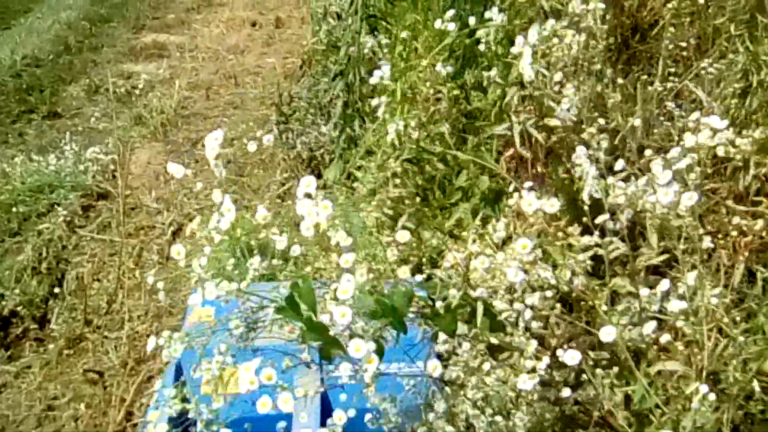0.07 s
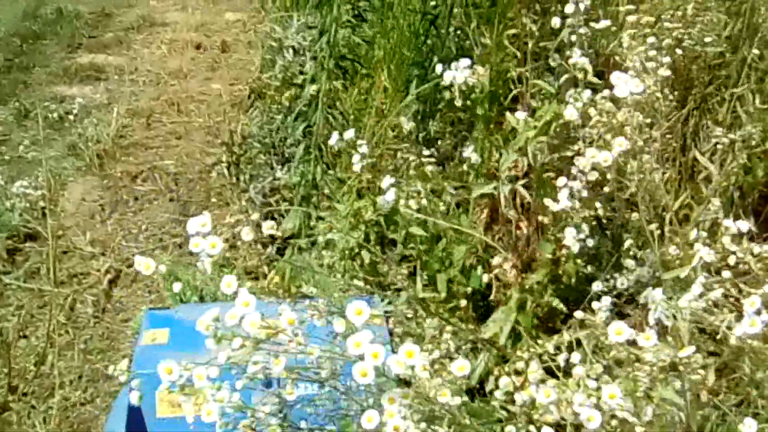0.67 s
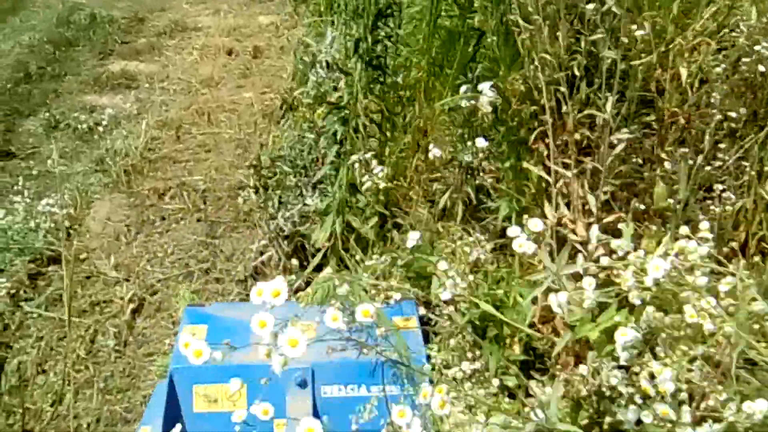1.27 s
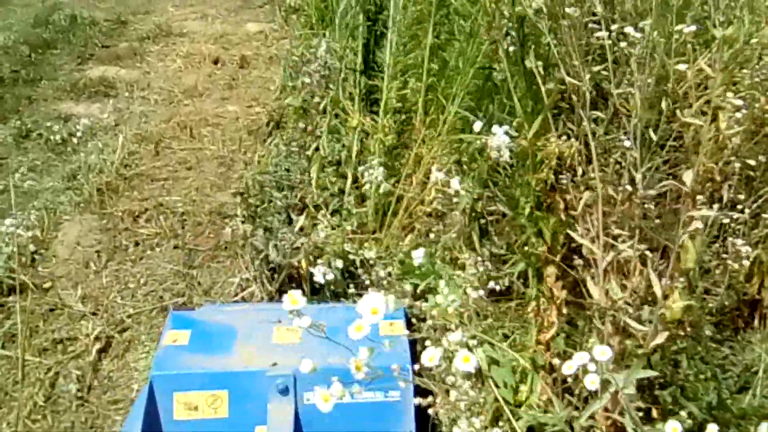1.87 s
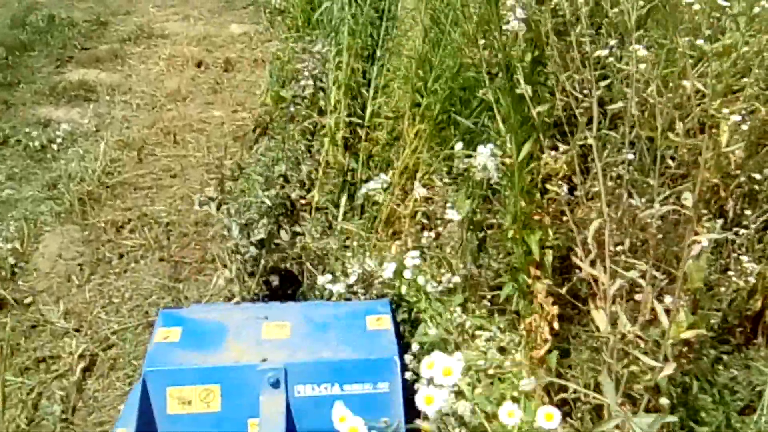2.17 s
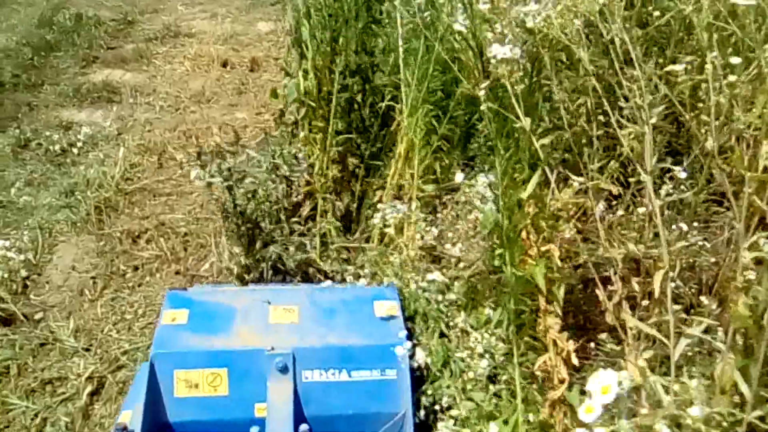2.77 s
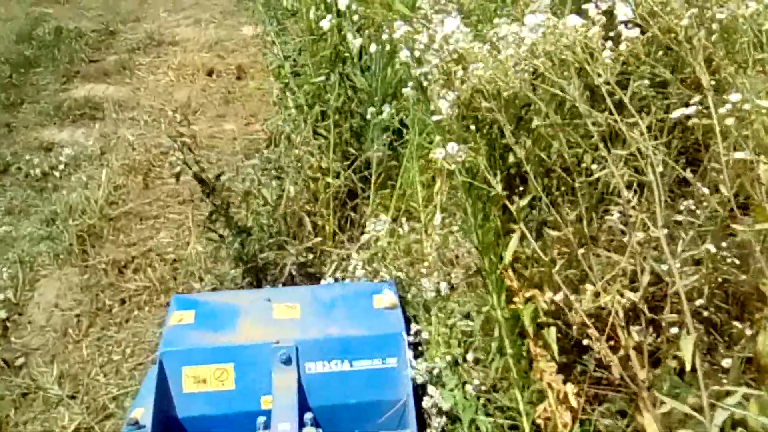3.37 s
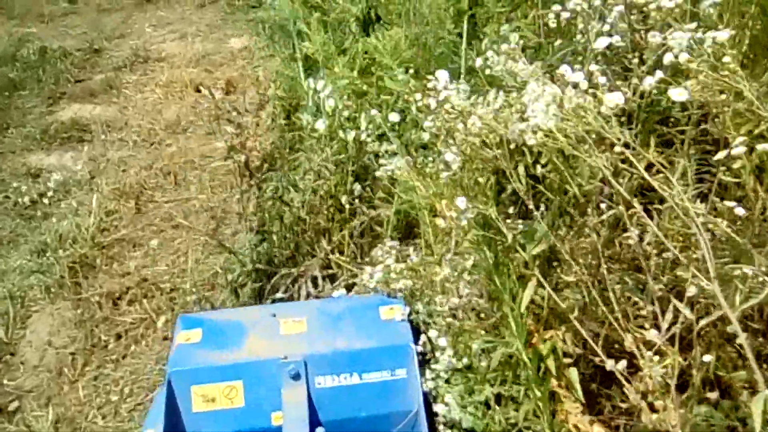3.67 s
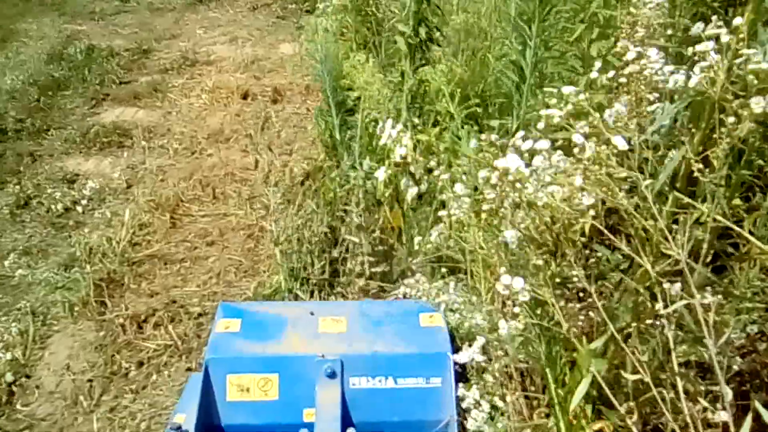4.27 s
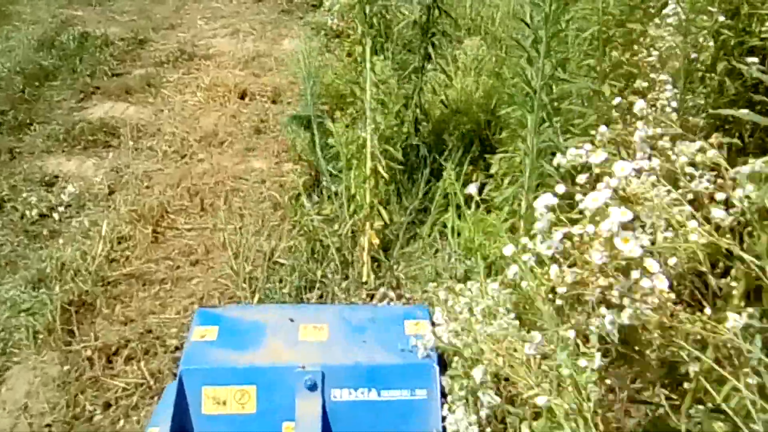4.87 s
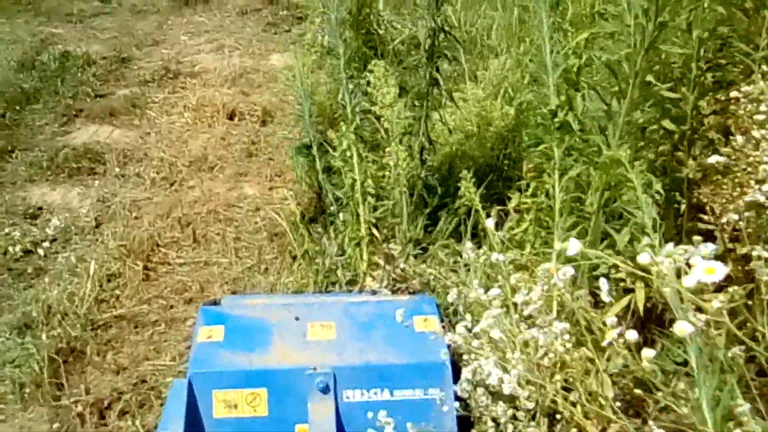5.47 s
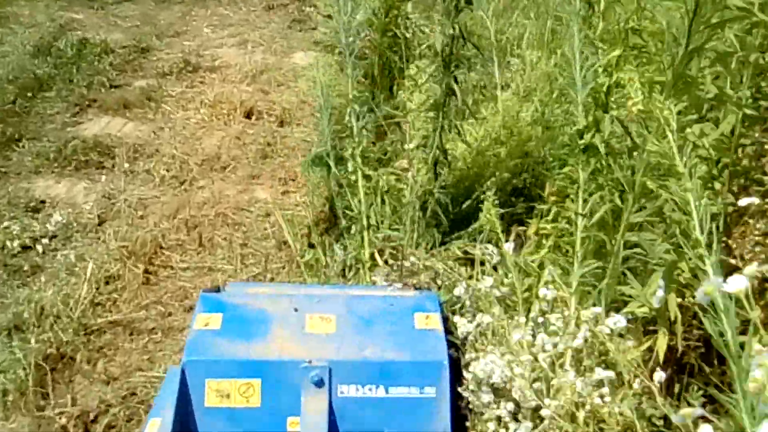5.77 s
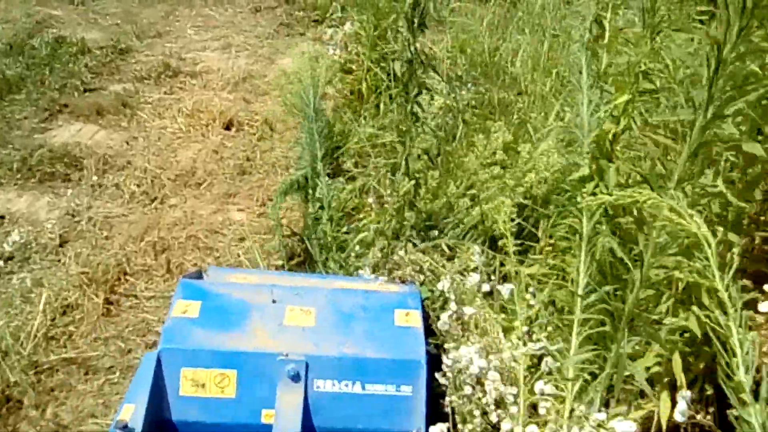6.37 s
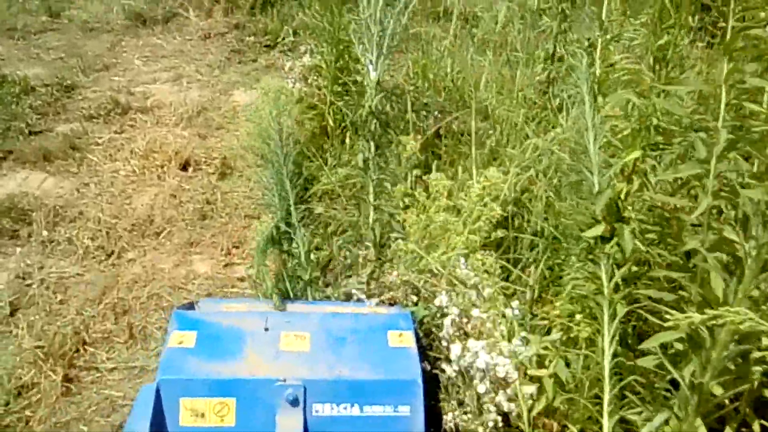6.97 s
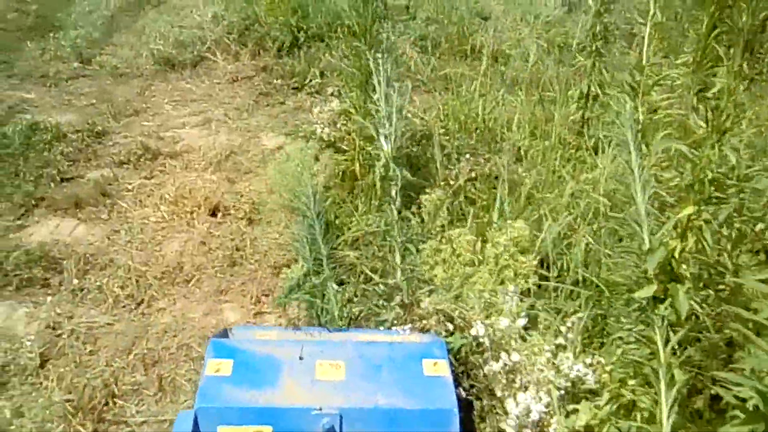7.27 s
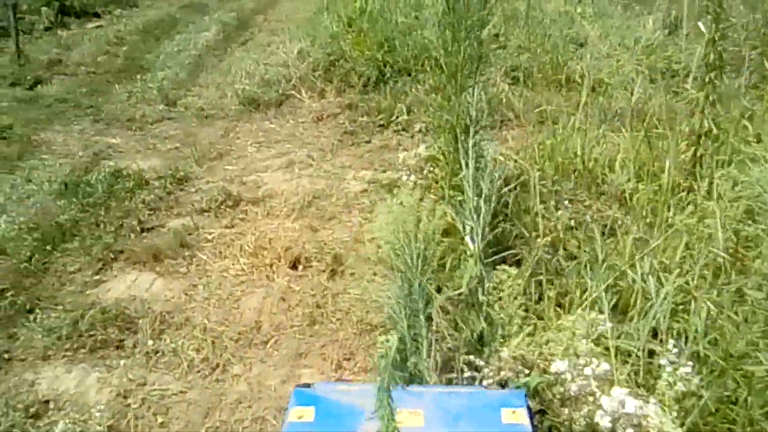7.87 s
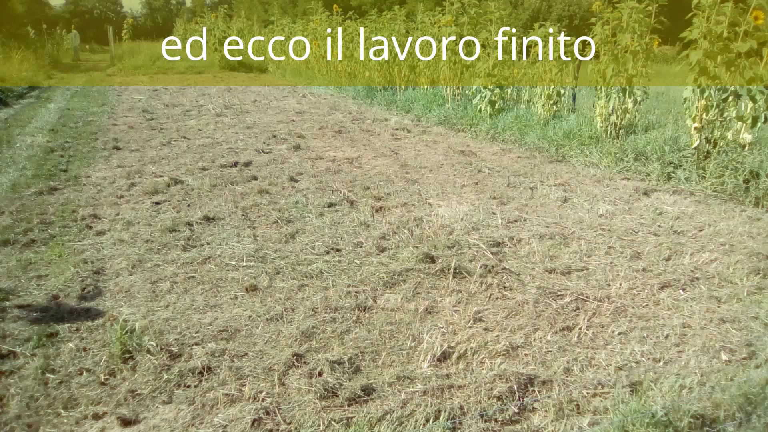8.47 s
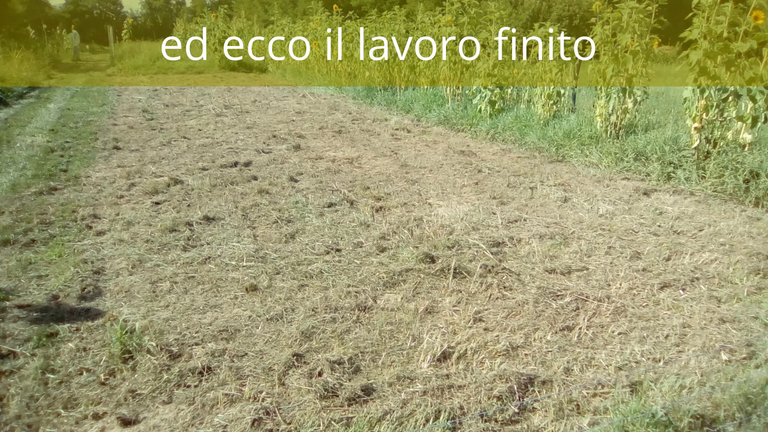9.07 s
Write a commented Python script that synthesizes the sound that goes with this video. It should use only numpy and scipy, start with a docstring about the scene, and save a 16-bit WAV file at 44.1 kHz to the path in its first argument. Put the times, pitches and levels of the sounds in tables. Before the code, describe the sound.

A small single-cylinder tractor chugs steadily with knocks, panel rattle and whining gears, while a flail mulcher in front hums and shreds tall weeds. Hard stalks and stones crack against the flails now and then. Midway the engine labours in a thick patch, booming and hissing, then recovers before everything cuts off abruptly. It is heard close, in stereo, from the driver's seat in a field.

```python
"""Tall weeds, from the driver's seat of a small single-cylinder tractor pushing a flail mulcher; stereo pair.
From the start each engine cycle gives a sharp pulse, knocks, a panel rattle and a puff of exhaust hiss; gears
whine, and out in front the rotor hums and shreds stalks under its steel hood. From 2 s hard stalks and stones
crack on the flails now and then. Near 4 s the engine labours in a thick patch: its speed sags, the casing
booms, the exhaust hisses, whine and rattle fade. By 6 s it recovers; at 8.27 s the sound breaks off abruptly."""
import sys
import numpy as np
from scipy import signal
from scipy.fft import rfft, irfft
from scipy.io import wavfile
from scipy.ndimage import uniform_filter1d, minimum_filter1d

SR = 44100
rng = np.random.default_rng(int(sys.argv[2]) if len(sys.argv) > 2 else 0)


def inscribe(sig):
    """Save sig as 16-bit PCM at rate SR to the path in sys.argv[1].

    A 1-D sig is mono; a 2-D sig holds one channel per row.
    Samples are clipped to [-1, 1] before scaling.
    """
    pcm = np.round(np.clip(np.atleast_2d(sig).T, -1, 1) * 32767)
    wavfile.write(sys.argv[1], SR, pcm.astype(np.int16))


N = 401751
TIME = np.arange(N) / SR

# engine speed: t/s, firing rate/Hz
FIRING_RATE = [(0.0, 26.761), (0.82, 27.071), (1.37, 26.942), (1.75, 27.501), (2.16, 27.135),
               (2.69, 27.332), (3.61, 26.814), (4.19, 25.629), (4.34, 25.987), (4.55, 25.449), (4.8, 25.61),
               (5.08, 24.249), (5.34, 25.451), (6.3, 27.994), (6.75, 27.696), (7.6, 27.314), (8.27, 26.37)]
# engine effort, used as its swing about the mean: t/s, level/dB
ENGINE_EFFORT = [(0, -45.5), (1.4, -45.5), (3.9, -44.5), (4.8, -41), (5.4, -39), (6.1, -41.5), (6.5, -44.5),
                 (7.6, -49.5), (8.27, -45.5)]
# lines of the engine pulse: multiple of the firing rate, relative level/dB
PULSE_ORDERS = [(2, -39.5), (3, -44.5), (4, -29.5), (5, -26.5), (6, -37.5), (7, -36), (8, -29), (9, -28.5),
                (10, -32), (11, -32.5), (12, -26.5), (13, -33), (14, -38), (15, -30.5), (16, -37),
                (17, -31), (18, -47), (19, -39), (20, -39), (21, -41.5), (22, -34), (23, -46), (24, -35),
                (25, -39.5), (26, -60.5)]
# loudness of the engine's clatter: t/s, level/dB
CLATTER_CURVE = [(0, -24.5), (0.8, -27), (3.3, -26), (5.0, -25), (8.27, -24)]
# piston and valve knocks: place in the cycle/0-1, relative level/dB
CYCLE_KNOCKS = [(.06, -7), (.26, -4), (.55, -4.5), (.66, -4), (.83, -16)]
# resonances of the engine block: f/Hz, width/Hz, relative level/dB
BLOCK_MODES = [(826, 80, -0.5), (1095, 110, 0), (1209, 31, -2), (1380, 260, -9), (1700, 120, -8),
               (1811, 50, -7), (2271, 53, -5), (2487, 54, -5), (3250, 560, -12.5)]
# spectrum of the exhaust hiss: f/Hz, relative level/dB
HISS_SPECTRUM = [(800, -24.5), (2500, 0.5), (6500, 5), (8200, -9.5), (10500, -13.5), (12000, -21.5),
                 (13800, -16.5), (15000, -8), (16000, -24.5)]
# resonances of a loose body panel: f/Hz, width/Hz, relative level/dB
PANEL_MODES = [(2493, 34, -2), (3060, 45, 4), (3200, 84, -1), (3280, 32, 5.5), (3470, 35, -2),
               (3650, 41, 3), (4300, 43, -11.5)]
# bouts in which the panel rattles harder: t/s, half length/s, rise/dB
RATTLE_BOUTS = [(1.04, 0.094, 5.0), (2.05, 0.22, 4), (2.52, .16, 5.5), (3.08, .14, 5.5), (4.32, 0.12, 7.5),
                (6.65, 0.24, 2), (8.08, 0.09, 6.5)]
# meshing gears, with sidebands: multiple of the firing rate, relative level/dB
MESH_ORDERS = [(38, -41), (39, -33.5), (40, -44.5), (41, -39.5), (43, -55), (44, -33.5), (45, -39.5)]
# high whine of lightly loaded gears: multiple of the firing rate, relative level/dB
HIGH_WHINE_ORDERS = [(66, -40.5), (67, -45.5)]
# hum of the flail rotor: multiple of its turning rate, relative level/dB
HUM_ORDERS = [(4, -32.5), (5, -41.5), (8, -50), (12, -33), (15, -41.5), (30, -41)]
# strength of that hum, used as its swing about the mean: t/s, level/dB
HUM_CURVE = [(0.1, -24.5), (0.57, -25), (4.09, -28), (4.97, -32), (5.17, -30.5), (5.67, -26), (6.03, -21),
             (7.05, -34.5), (8.2, -25.5)]
# resonances of the steel hood: f/Hz, width/Hz, relative level/dB
HOOD_MODES = [(455.6, 110, -1.5), (565, 240, -13), (614, 11, 3.5), (662, 26, 4)]
# clumps of mulch passing under the hood: t/s, half length/s, rise/dB
MULCH_CLUMPS = [(0.78, .16, 2.5), (1.76, .13, 4.0), (2.66, .12, 4.5), (3.76, .16, 5), (4.78, .08, 4),
                (6.15, .33, 5.0)]
# spectrum of the shredding: f/Hz, relative level/dB
SHRED_SPECTRUM = [(500, -16.5), (1500, -6), (2800, 2), (4300, 1), (5200, -2), (5900, -0.5), (6900, -5),
                  (8000, -19), (10000, -24.5), (11500, -31.5), (13800, -33), (15000, -23), (16000, -46)]
# spectrum of the churned air: f/Hz, relative level/dB
AIR_SPECTRUM = [(12, -0.5), (25, -5.5), (45, -15.5), (80, -18), (125, -1.5), (200, -2), (400, -0.5),
                (520, -3.5), (750, -1), (1100, -6.5), (1400, -9), (2000, -14), (4000, -8.5), (9000, -62)]
# hard stalks and stones on the flails: t/s, peak level/dB, ring f/Hz
FLAIL_HITS = [(2.119, -6.5, 3030), (2.865, -16, 6200), (3.170, -16, 2810), (3.857, -20, 5400),
              (4.040, -6.5, 4910), (5.459, -12, 3600), (7.362, -17, 6000), (8.131, -10, 3200),
              (8.242, -10, 3700), (8.259, -22, 4000)]
# likeness of noise at the two microphones: f/Hz, correlation/0-1
MIC_LIKENESS = [(60, .997), (250, .994), (550, .985), (1000, .88), (1400, .77), (2000, .62), (4000, .35),
                (8000, .05)]
# balance of the microphone pair: f/Hz, left minus right level/dB
MIC_BALANCE = [(60, 0), (140, -2.3), (330, -2), (800, -2), (1200, -0.5), (1700, -6.5), (2500, 0),
               (3200, 4.5), (3900, 0.5), (4800, 0), (5800, 8.5), (6800, 12), (9000, 19.5), (15000, 9)]

FREE_HZ, BOGGED_HZ = 27.5, 25.8   # firing rate running free and fully bogged down
CASE_RING_HZ, CASE_RANGE_HZ = 27.1, .65   # firing rates around which the gear case rings
ROTOR_RATIO = 1.3594   # rotor turns per firing
PULSE_AT, PUFF_AT, RATTLE_AT, BOUNCE_AT = 0.1786, .87, .69, 1   # places in the cycle, 0-1
# levels running free, and their change when fully bogged down
PULSE_DB, PULSE_BOGGED_DB = -18.5, -0.6
BOOM_DB, BOOM_BOGGED_DB = -2, 7.5
RATTLE_DB, RATTLE_BOGGED_DB = -29, -10
AIR_DB, AIR_BOGGED_DB = -25.5, 1
# gains at mean effort, and dB gained per dB of effort
EXHAUST_DB, EXHAUST_FOLLOWS = -39.5, 1.81
GEAR_DB, GEAR_FOLLOWS = -10.5, -0.23
HOOD_DB, HOOD_FOLLOWS = -25.5, .25
SHRED_DB, SHRED_FOLLOWS = -26.3, 0.18
HUM_DB, HUM_FOLLOWS = 0.65, 0.94   # gain at the mean of HUM_CURVE, and dB per dB of its swing
STOP_S = 8.27


def from_db(db):
    """Decibels to gain."""
    return 10 ** (np.asarray(db) / 20)


def rms_one(x):
    """Scale to unit rms."""
    return x / np.sqrt(np.mean(x ** 2) + 1e-20)


def in_time(rows):
    """A curve at every sample."""
    return np.interp(TIME, *np.transpose(rows))


def swing(rows):
    """A level curve as dB above its mean while the machine runs."""
    db = in_time(rows)
    return db - db[TIME < STOP_S].mean()


def swells(rows):
    """Bell-shaped rises in level/dB, one for each row."""
    return sum(db * np.exp(-((TIME - s) / half_s) ** 2) for s, half_s, db in rows)


def at_hz(points, size=4096):
    """A spectrum on an even frequency grid, joined on a log axis."""
    hz, value = np.transpose(points)
    return np.interp(np.log(np.linspace(1, SR / 2, size + 1)), np.log(hz), value)


def drift(rate):
    """A random wander of spread 1, with `rate` new values a second."""
    knots = rng.standard_normal(4000)
    return np.interp(TIME * rate, np.arange(len(knots)), knots) * np.sqrt(3 / 2)


def colour(x, db):
    """Minimum-phase filter from levels on the even grid: it rings after a blow, never before."""
    cepstrum = irfft(np.log(from_db(db)))
    half = len(cepstrum) // 2
    cepstrum[1:half] *= 2
    cepstrum[half + 1:] = 0
    impulse = irfft(np.exp(rfft(cepstrum)))
    return signal.oaconvolve(np.atleast_2d(x), impulse[None], axes=1)[:, :N]


def resonate(x, modes):
    """Parallel resonances with alternating signs."""
    out = 0
    for k, (hz, width, db) in enumerate(modes):
        r = np.exp(-np.pi * width / SR)
        poles = [1, -2 * r * np.cos(2 * np.pi * hz / SR), r * r]
        out = out + (-1) ** k * from_db(db) * (1 - r * r) / 2 * signal.lfilter([1, 0, -1], poles, x)
    return out


def wide_noise():
    """White noise at the two microphones, alike in the bass and unrelated in the treble."""
    alike = np.clip(at_hz(MIC_LIKENESS), -.999, .999)
    mid = colour(rng.standard_normal(N), 10 * np.log10(1 + alike))
    side = colour(rng.standard_normal(N), 10 * np.log10(1 - alike))
    return rms_one(mid + side * [[1], [-1]])


def burst(cycles, place, rise, decay):
    """Envelope that swells and dies once a cycle; times are shares of the cycle."""
    age = (cycles - place) % 1
    return (1 - np.exp(-age / rise)) * np.exp(-age / decay)


def shaft_tones(turns, orders, waver_db, waver_rate, shake_rad=0.06):
    """Tones locked to a shaft, each wavering in strength and shaken in phase."""
    out = 0
    for k, db in orders:
        angle = 2 * np.pi * (k * turns + rng.random()) + shake_rad * drift(waver_rate)
        out = out + from_db(db + waver_db * drift(waver_rate)) * np.cos(angle)
    return np.sqrt(2) * out


def engine_pulse(cycles, speed, boom_db, boom_hz=330, boom_octaves=0.22,
                 bare_db=-32.5, bare_hz=600, waver_db=0.76, uneven_db=0.67):
    """One sharp suction pulse a cycle, the pipes ringing on in between; under load the casing booms."""
    out = 0
    for k, db in PULSE_ORDERS:
        near_boom = np.exp(-(np.log2(k * speed / boom_hz) / boom_octaves) ** 2)
        gain = from_db(db + near_boom * boom_db + waver_db * drift(7))
        bare = from_db(bare_db) * np.exp(-(k * speed / bare_hz) ** 2)
        # what a line holds beyond the bare pulse is ringing, which leads or lags it
        ring_phase = rng.choice([-1, 1]) * np.arccos(np.clip(bare / gain, 0, 1))
        out = out - gain * np.cos(2 * np.pi * k * (cycles - PULSE_AT) + ring_phase)
    return rms_one(out * from_db(uneven_db * drift(27)))


def clatter(cycles, uneven_db=3.5, floor=0.26):
    """Piston and valves knock on the block, a little differently in each cycle."""
    knocks = sum(from_db(db + uneven_db * drift(27)) * burst(cycles, place, rise=0.014, decay=.07)
                 for place, db in CYCLE_KNOCKS)
    return rms_one(resonate(wide_noise() * (floor + knocks), BLOCK_MODES))


def exhaust_hiss(cycles, uneven_db=0.5, crunch_db=0.5):
    """Gas jets out in a ragged puff each time the exhaust valve opens."""
    ragged = from_db(uneven_db * drift(27) + crunch_db * drift(700))
    puffs = ragged * burst(cycles, PUFF_AT, rise=0.064, decay=.14)
    return rms_one(colour(wide_noise() * puffs, at_hz(HISS_SPECTRUM)))


def panel_rattle(cycles, decay=.035, uneven_db=2.4, bounce_db=-4, buzz=0.053):
    """Each firing throws a loose panel against its stop: a short ping, a bounce and a faint buzz."""
    ping = burst(cycles, RATTLE_AT, 0.012, decay) * from_db(uneven_db * drift(27))
    bounce = burst(cycles, BOUNCE_AT, 0.0032, decay) * from_db(bounce_db + uneven_db * drift(27))
    return rms_one(resonate(wide_noise() * (ping + bounce + buzz), PANEL_MODES))


def engine(cycles, speed, bogged, effort_db):
    """Close to the seat: effort hardens the exhaust; as speed sags the casing booms, the panel quietens."""
    boom_db = BOOM_DB + BOOM_BOGGED_DB * bogged
    pulse = from_db(PULSE_DB + PULSE_BOGGED_DB * bogged) * engine_pulse(cycles, speed, boom_db)
    knocks = from_db(in_time(CLATTER_CURVE)) * clatter(cycles)
    hiss = from_db(EXHAUST_DB + EXHAUST_FOLLOWS * effort_db) * exhaust_hiss(cycles)
    rattle = from_db(RATTLE_DB + RATTLE_BOGGED_DB * bogged + swells(RATTLE_BOUTS)) * panel_rattle(cycles)
    return pulse + knocks + hiss + rattle


def gears(cycles, speed, effort_db, ring_db=11, high_db=1.5, fade_db_per_hz=12.5):
    """The mesh whines loudest at the speed that rings its case; a higher whine joins when running free."""
    in_tune = np.exp(-((speed - CASE_RING_HZ) / CASE_RANGE_HZ) ** 2)
    sag_hz = np.maximum(FREE_HZ - speed, 0)
    mesh = shaft_tones(cycles, MESH_ORDERS, waver_db=1.0, waver_rate=17, shake_rad=0.2)
    high_whine = shaft_tones(cycles, HIGH_WHINE_ORDERS, waver_db=3.0, waver_rate=25, shake_rad=0.4)
    return (from_db(GEAR_DB + ring_db * in_tune + GEAR_FOLLOWS * effort_db) * mesh
            + from_db(high_db - fade_db_per_hz * sag_hz) * high_whine)


def rotor_hum(cycles):
    """The flail rotor, geared to the engine, hums at multiples of its turning rate."""
    hum = shaft_tones(cycles * ROTOR_RATIO, HUM_ORDERS, waver_db=2.5, waver_rate=8)
    return from_db(HUM_DB + HUM_FOLLOWS * swing(HUM_CURVE)) * hum


def hood_drumming(lumpy_db=0.5):
    """Mulch drums on the steel hood, swelling as each clump passes."""
    mulch = wide_noise() * from_db(lumpy_db * drift(50))
    return from_db(swells(MULCH_CLUMPS)) * rms_one(resonate(mulch, HOOD_MODES))


def shredding(snaps_per_s=700, size_db=4.5, snap_s=0.0038, rustle=0.39):
    """Stalks snap in quick succession, each a tiny burst over the rustle of leaves."""
    sizes = from_db(size_db * np.minimum(rng.exponential(1, N), 3.5))
    snaps = (rng.random(N) < snaps_per_s / SR) * sizes ** 2
    power = signal.lfilter([1], [1, -np.exp(-1 / (snap_s * SR))], snaps + 1e-18)
    envelope = np.sqrt(rustle + power / power.mean() / 2)
    return rms_one(colour(wide_noise() * envelope, at_hz(SHRED_SPECTRUM)))


def rotor_air(patchy_db=2.5):
    """Turbulent air churned by the flails."""
    return rms_one(colour(wide_noise() * from_db(patchy_db * drift(60)), at_hz(AIR_SPECTRUM)))


def flail_hits(decay_s=0.0058, width_hz=900):
    """A hard stalk or a stone gives a brief crack with a ring of steel, dulled by the hood."""
    out, age = np.zeros((2, N)), np.arange(SR // 40) / SR
    dull = signal.butter(6, 7000, fs=SR, output="sos")
    for s, db, hz in FLAIL_HITS:
        snap = rng.standard_normal((2, len(age))) * np.exp(-age / decay_s)
        crack = signal.sosfilt(dull, resonate(snap, [(hz, width_hz, 0)]))
        start = round(s * SR)
        out[:, start:start + len(age)] += from_db(db) * crack / np.abs(crack).max()
    return out


def mulcher(cycles, bogged, effort_db):
    """Out in front: the rotor hums; the more weeds it takes in, the louder it drums, shreds and churns."""
    hum = rotor_hum(cycles)
    drumming = from_db(HOOD_DB + HOOD_FOLLOWS * effort_db) * hood_drumming()
    stalks = from_db(SHRED_DB + SHRED_FOLLOWS * effort_db) * shredding()
    air = from_db(AIR_DB + AIR_BOGGED_DB * bogged) * rotor_air()
    return hum + drumming + stalks + air + flail_hits()


def scene():
    """Engine, gears and mulcher from the driver's seat, all driven by one crankshaft."""
    speed, effort_db = in_time(FIRING_RATE), swing(ENGINE_EFFORT)
    cycles = np.cumsum(speed) / SR
    bogged = np.clip((FREE_HZ - speed) / (FREE_HZ - BOGGED_HZ), 0, 1)
    return (engine(cycles, speed, bogged, effort_db) + gears(cycles, speed, effort_db)
            + mulcher(cycles, bogged, effort_db))


def limiter(x, ceiling_db=-2.5, window=221):
    """The recorder turns its gain down for a few milliseconds around each peak above the ceiling."""
    needed = np.minimum(1, from_db(ceiling_db) / (np.abs(x).max(axis=0) + 1e-12))
    return x * uniform_filter1d(minimum_filter1d(needed, window), window)


def record(dry, left_lag_s=1.25e-4, cutoff_hz=15700):
    """Two unlike microphone ports, the left slightly farther off; then limiter, dead stop and top cut."""
    balance_db = at_hz(MIC_BALANCE)
    left = np.interp(TIME - left_lag_s, TIME, dry[0])
    pair = np.vstack([colour(left, balance_db / 2), colour(dry[1], -balance_db / 2)])
    top_cut = signal.ellip(10, .2, 80, cutoff_hz, fs=SR, output="sos")
    return signal.sosfilt(top_cut, limiter(pair) * (TIME < STOP_S))


dry = scene()
out = record(dry)
inscribe(out)
```